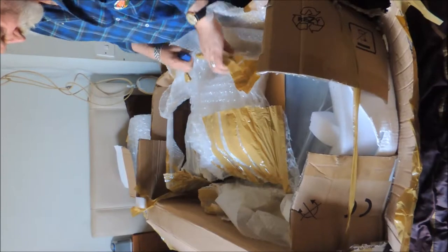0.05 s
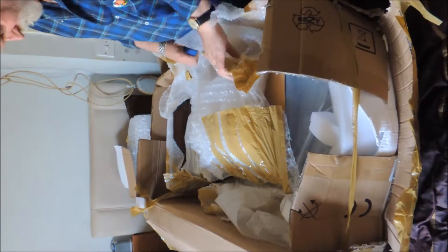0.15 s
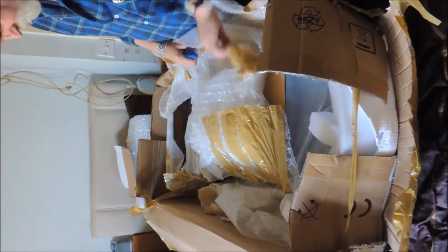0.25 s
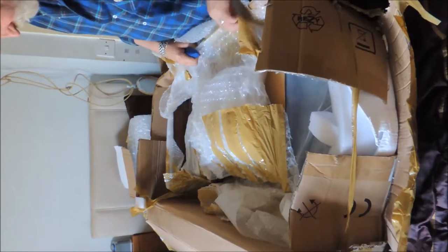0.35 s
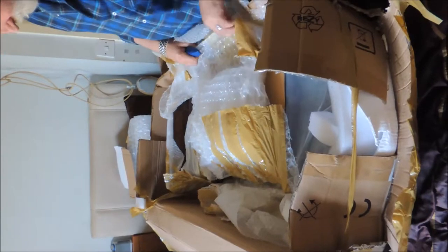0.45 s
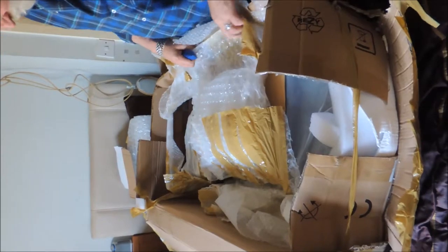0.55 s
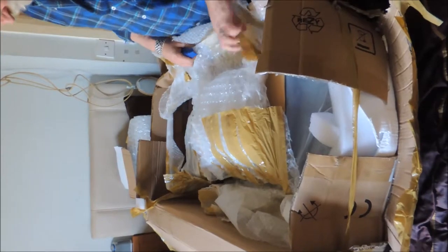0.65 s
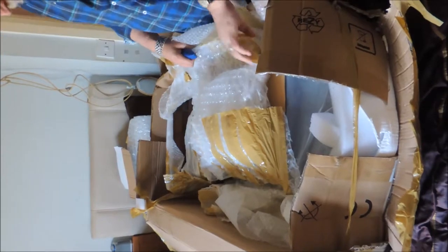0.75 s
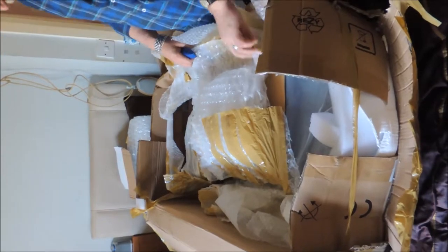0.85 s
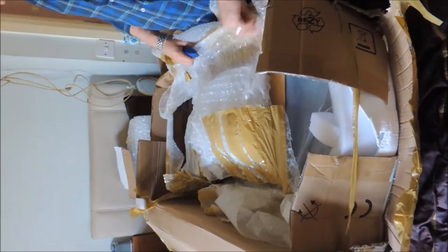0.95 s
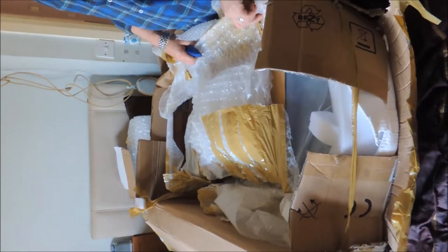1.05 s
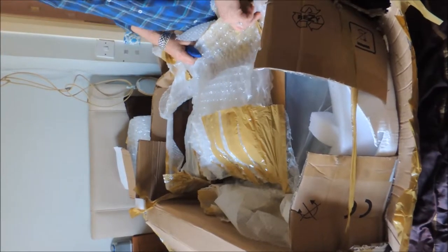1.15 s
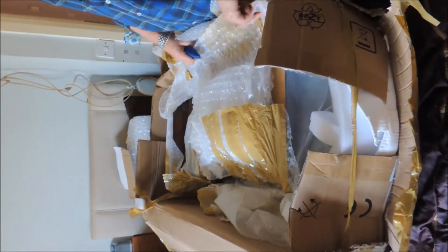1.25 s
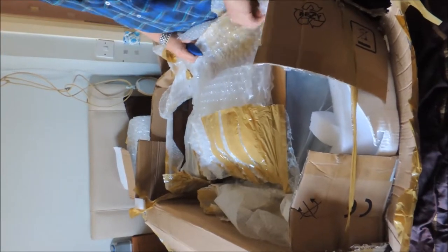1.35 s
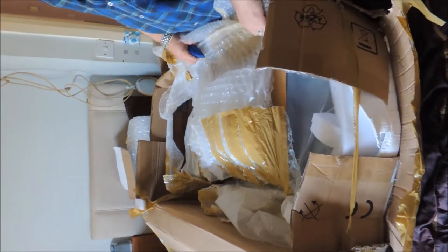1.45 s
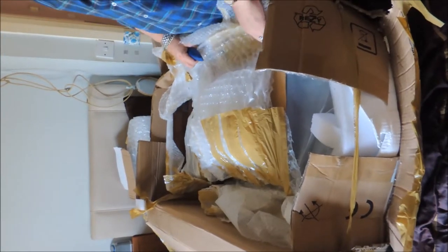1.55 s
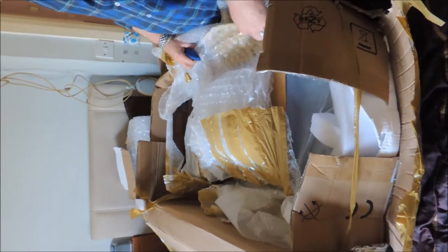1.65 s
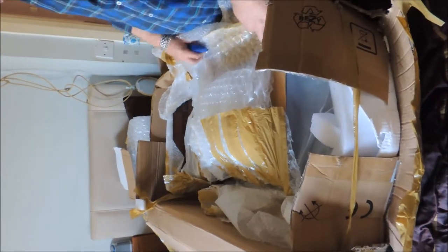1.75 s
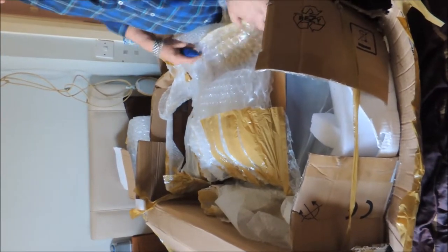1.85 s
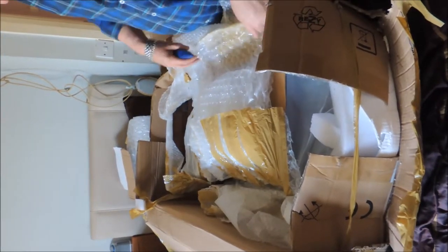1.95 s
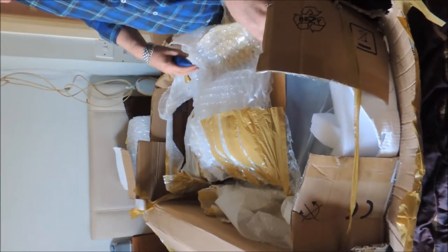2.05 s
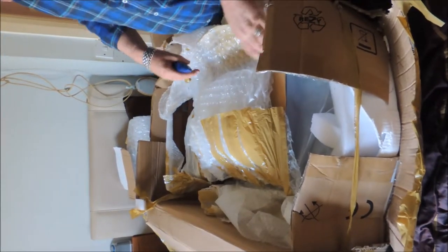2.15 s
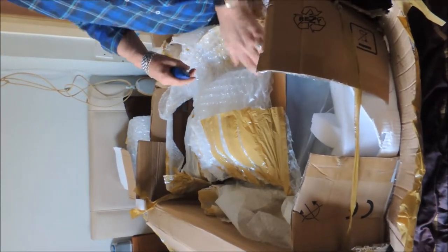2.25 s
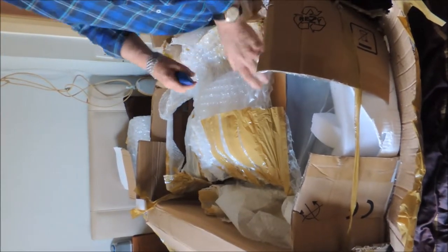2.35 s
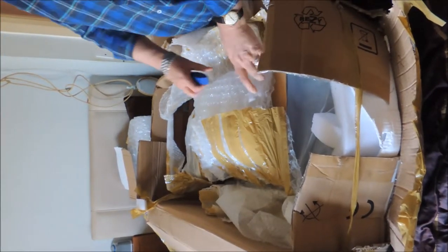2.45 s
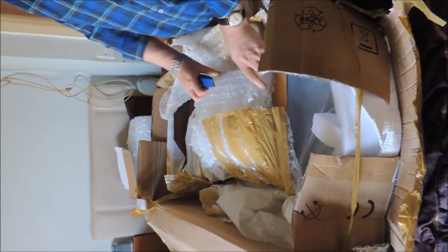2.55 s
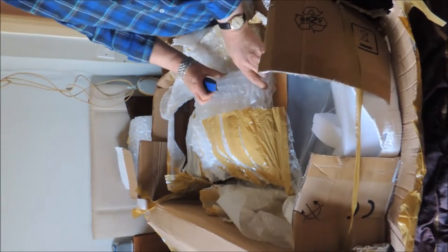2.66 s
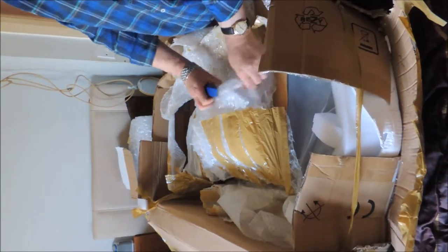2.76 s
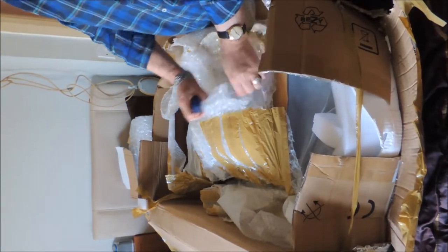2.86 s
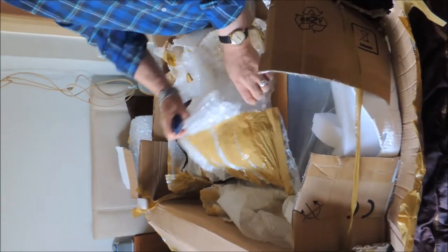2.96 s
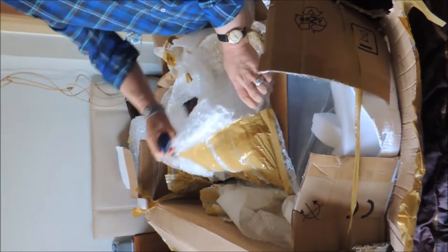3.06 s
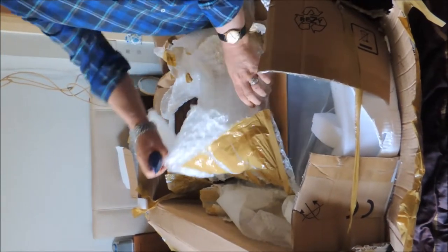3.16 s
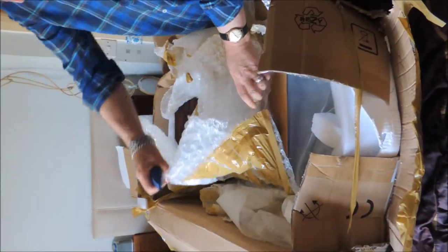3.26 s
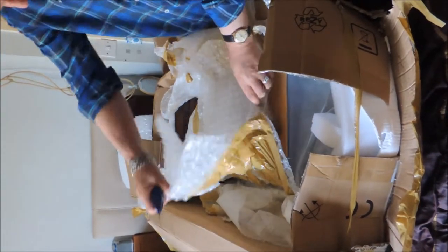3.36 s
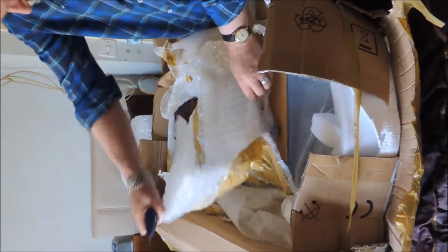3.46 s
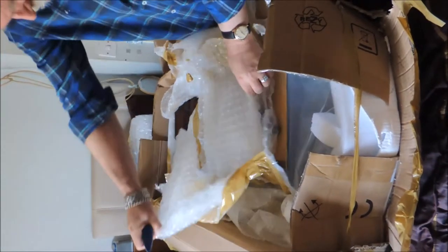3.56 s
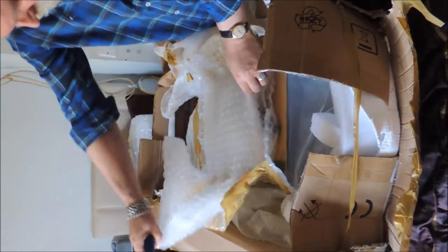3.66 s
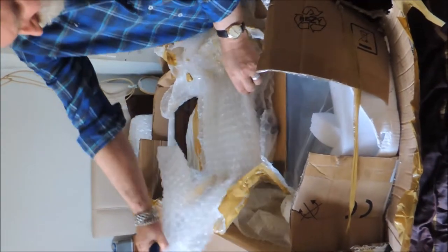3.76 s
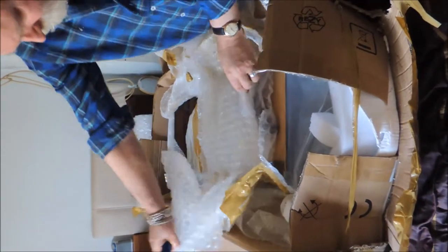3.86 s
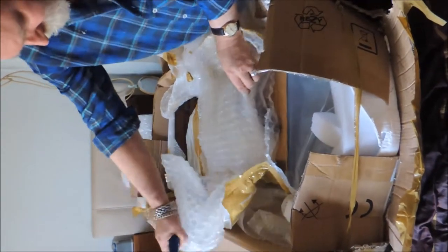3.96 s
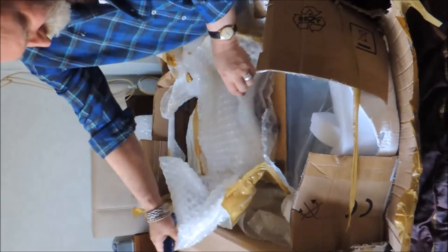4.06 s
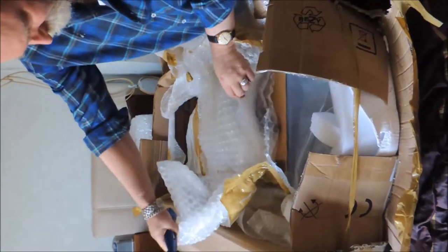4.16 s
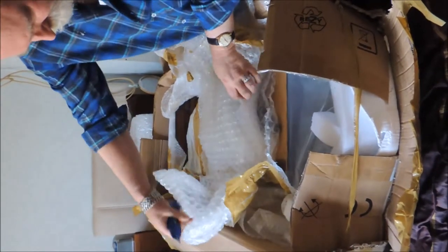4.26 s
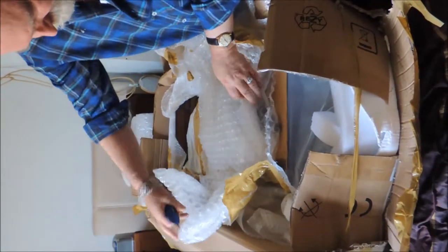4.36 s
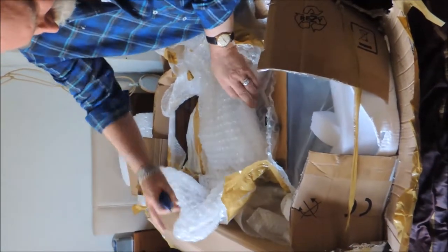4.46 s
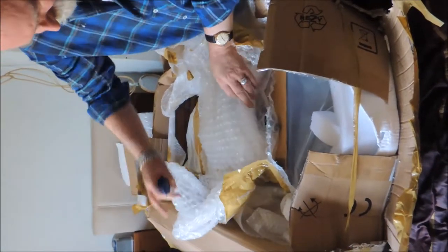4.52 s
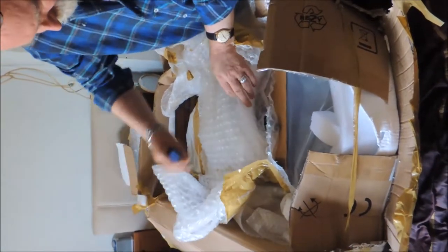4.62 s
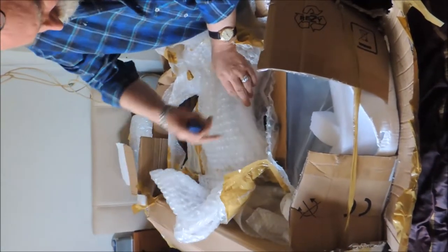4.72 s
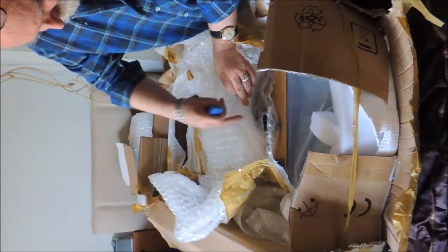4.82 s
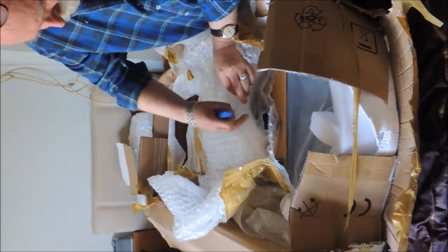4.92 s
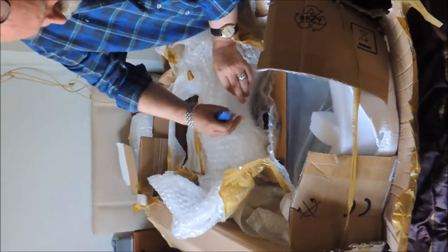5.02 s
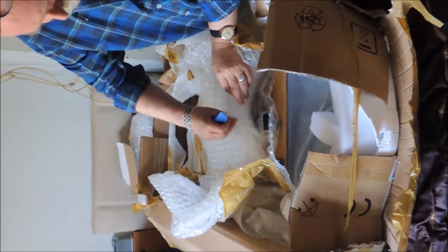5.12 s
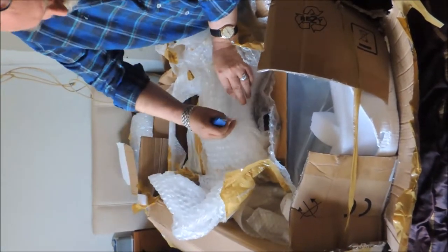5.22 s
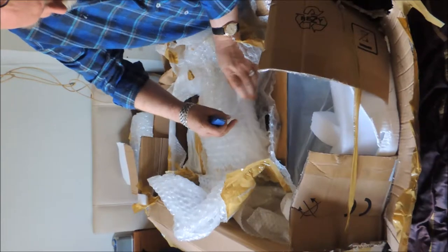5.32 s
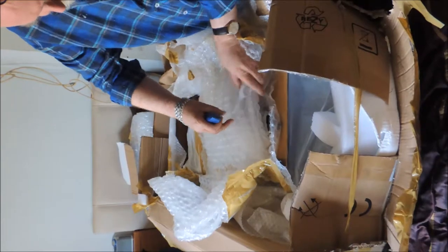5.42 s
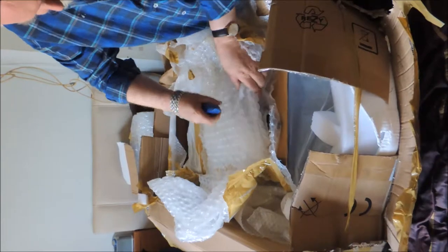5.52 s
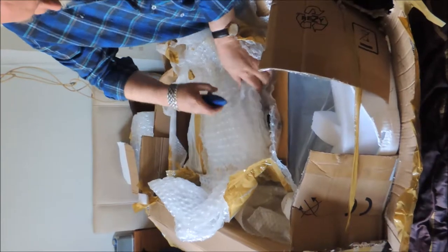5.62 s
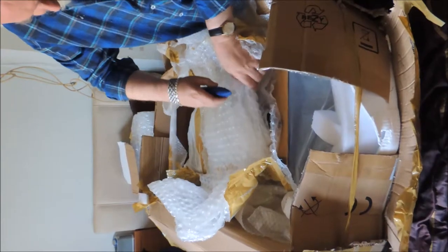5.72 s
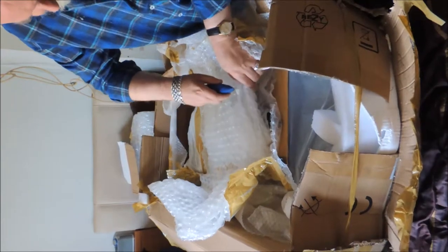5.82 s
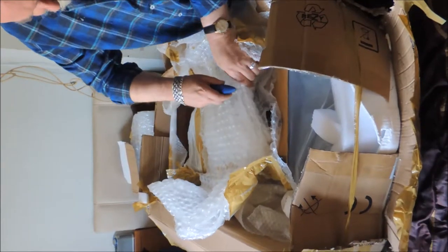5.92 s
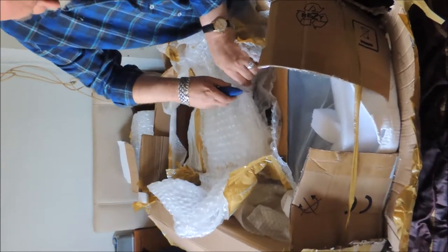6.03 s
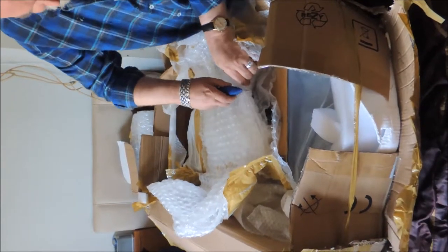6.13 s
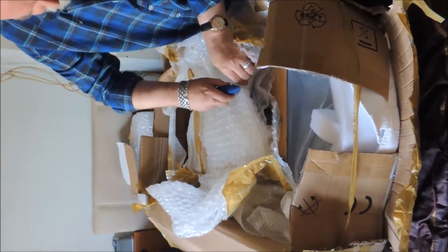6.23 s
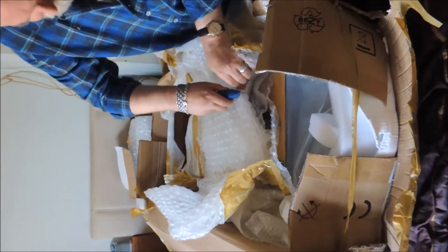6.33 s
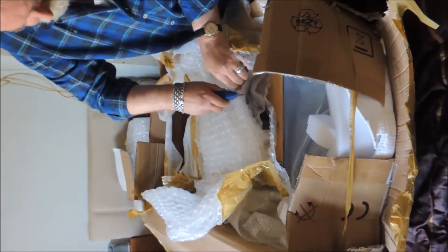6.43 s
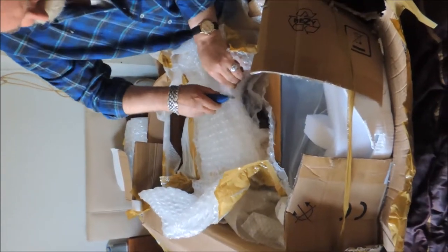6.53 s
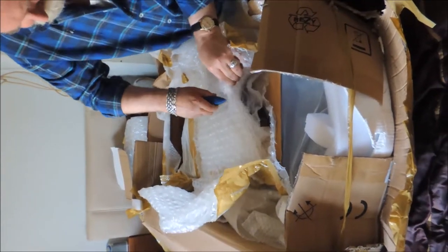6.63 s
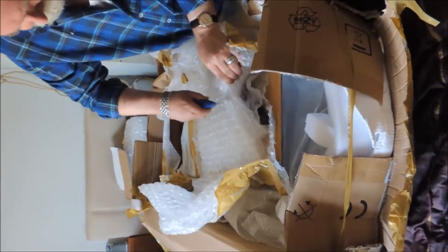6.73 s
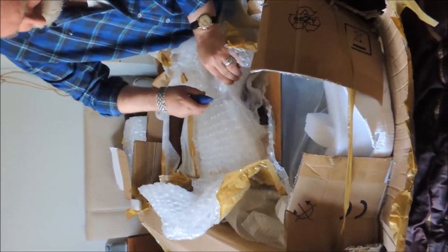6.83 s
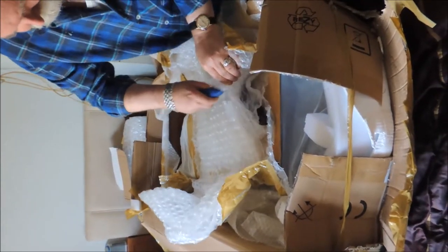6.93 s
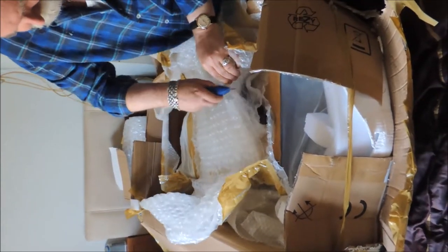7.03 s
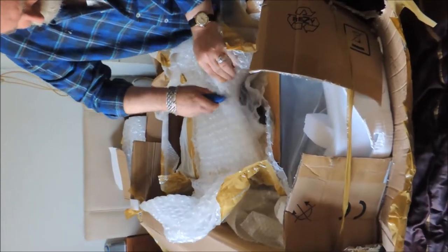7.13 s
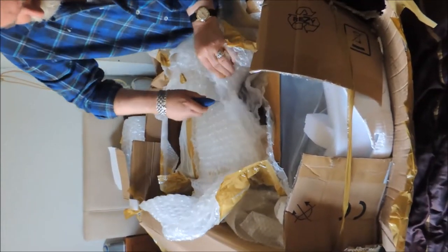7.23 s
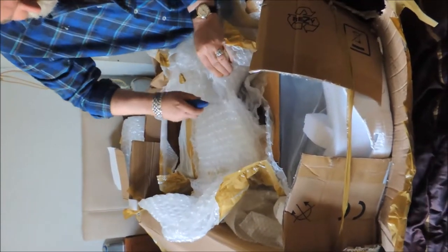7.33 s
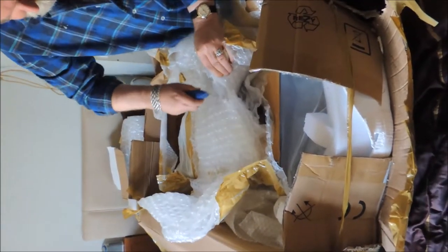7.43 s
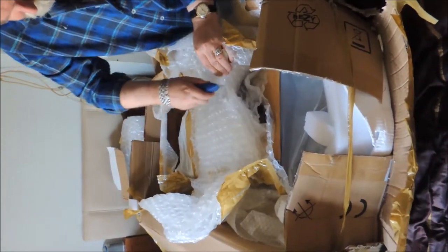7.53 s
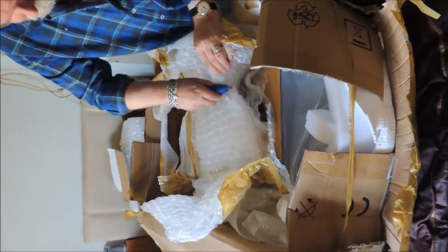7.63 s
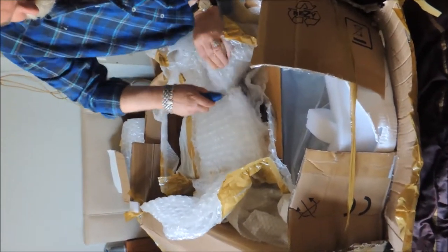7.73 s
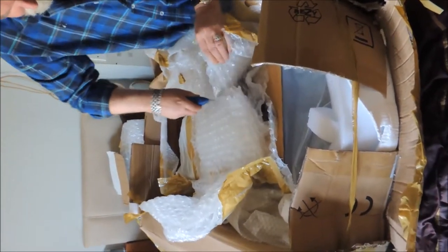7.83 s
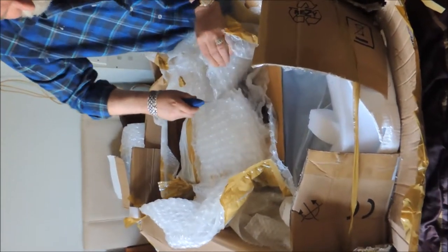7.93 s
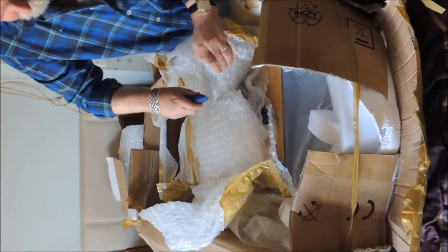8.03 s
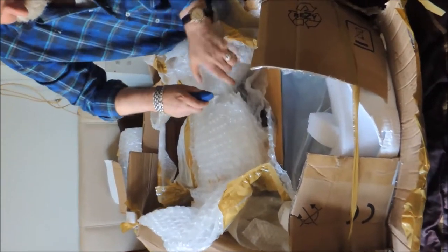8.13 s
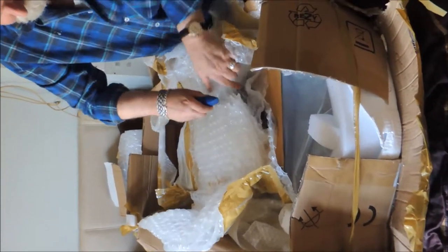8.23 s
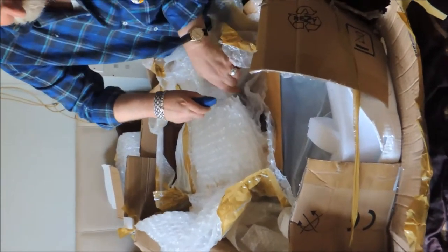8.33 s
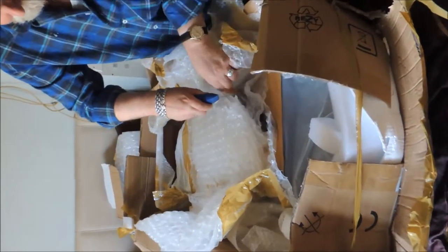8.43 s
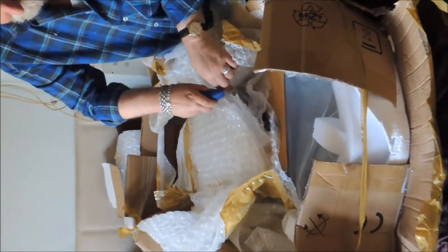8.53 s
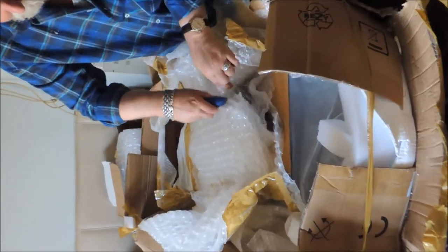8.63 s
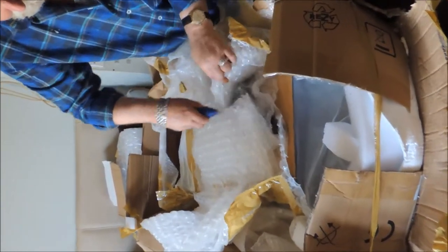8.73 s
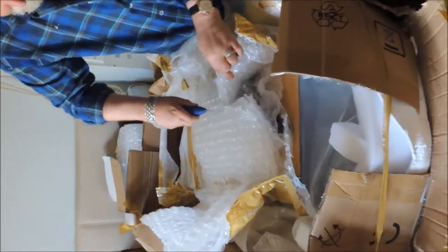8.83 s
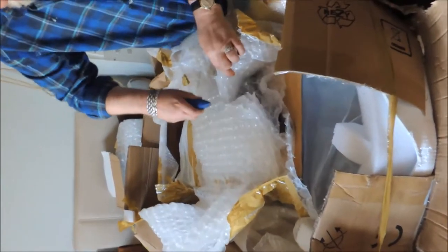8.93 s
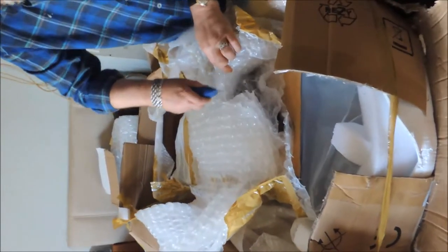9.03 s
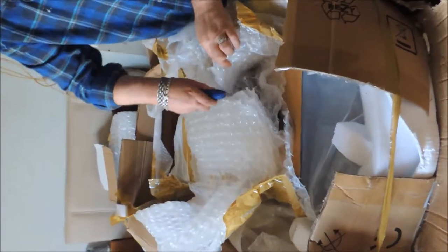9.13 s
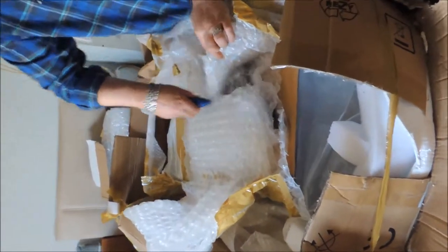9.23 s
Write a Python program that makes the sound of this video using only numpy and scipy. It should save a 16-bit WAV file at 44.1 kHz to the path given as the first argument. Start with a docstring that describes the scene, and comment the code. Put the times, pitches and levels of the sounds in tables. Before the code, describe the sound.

Close plastic packing film crinkles in uneven bursts, with sharp cracks, soft rustling and hollow cardboard bumps, indoors.

```python
"""In a small furnished room, hands pull taped bubble wrap out of a cardboard carton about a metre away.
Creases in the film buckle in sharp snaps and swarms of tiny crinkles: pulses with short damped rings.
Sheets rub and a sleeve slides as shaped noise; nudged cardboard scuffs in dull bands of noise.
Every click comes back from flaps and walls and rings the hollow carton, over room tone and a low air
rumble. The loudest cracks are limited and rounded off."""
import sys
import numpy as np
from scipy import signal
from scipy.fft import rfft, irfft, next_fast_len
from scipy.io import wavfile
from scipy.ndimage import uniform_filter1d, minimum_filter1d

SR = 44100
rng = np.random.default_rng(int(sys.argv[2]) if len(sys.argv) > 2 else 0)


def to_wav(sig):
    """Store sig (one row per channel, or 1-D mono) as 16-bit WAV at the path in sys.argv[1].

    Samples outside -1..1 are clipped; the rate is SR.
    """
    pcm = np.clip(np.atleast_2d(sig), -1, 1) * 32767
    pcm = np.round(pcm).astype(np.int16)
    wavfile.write(sys.argv[1], SR, pcm.T)  # frames by channels


N = 409248
TIME = np.arange(N) / SR
SIZE = next_fast_len(N + SR)  # transform length, with room for the tails
FREQ = np.maximum(np.arange(SIZE // 2 + 1) * SR / SIZE, 1)
TOP_HZ = 14300  # upper edge of the sound


def undb(db):
    """Decibels to gain."""
    return 10 ** (np.asarray(db) / 20)


def unit(x):
    """Scale to rms 1."""
    return x / np.sqrt(np.mean(x ** 2))


def unit_energy(x):
    """Scale a response to energy 1 per channel, averaged over the channels."""
    return unit(x) / np.sqrt(x.shape[-1])


def curves(table):
    """Each column of a curve table, interpolated at every sample."""
    s, *columns = np.transpose(table)
    return np.array([np.interp(TIME, s, column) for column in columns])


def colour(points):
    """Gain at every frequency from (f/Hz, level/dB) points, joined on a log frequency axis."""
    hz, db = np.transpose(points)
    return undb(np.interp(np.log(FREQ), np.log(hz), db))


def shaped(x, gain):
    """Filter by a gain at every frequency."""
    return irfft(rfft(x, SIZE) * gain, SIZE)[..., :x.shape[-1]]


# stereo width at the two microphone ports: f/Hz, side minus mid level/dB
SIDE_WIDTH = [(150, -19), (450, -17), (1000, -6), (2200, 0), (7000, 1), (12000, -1)]


def diffuse(size):
    """Noise from all around: alike at both ports in the bass, nearly unrelated in the treble."""
    mid, side = rng.standard_normal((2, size))
    width = colour(SIDE_WIDTH)
    norm = 1 / np.sqrt(1 + width ** 2)
    return shaped(mid, norm) + shaped(side, width * norm) * np.array([[1], [-1]])


def resonant_noise(hz, width_hz):
    """Noise in one resonance whose centre may move: slow noise carried up to that pitch."""
    slow = shaped(diffuse(N), 1 / (1 + (2 * FREQ / width_hz) ** 2))
    phase = 2 * np.pi * np.cumsum(hz * np.ones(N)) / SR
    return unit(slow * np.cos(phase))


# colour of the quiet room: f/Hz, relative spectrum level/dB
ROOM_TONE = [(18, -28), (30, -33), (144, -8.5), (241, -12.5), (1460, -44), (1700, -36), (2840, -41),
             (4400, -17), (14000, -57)]
ROOM_TONE_DB = -58.5


def air(level_db, draught_db=-48, draught_growth=0.19, corner_hz=45):
    """The quiet room, and the low rumble of stirred air at the ports, stronger when hands work harder."""
    room_tone = unit(shaped(diffuse(N), colour(ROOM_TONE)))
    rumble = unit(shaped(diffuse(N), FREQ / (FREQ + 10) / (1 + (FREQ / corner_hz) ** 2)))
    stir_db = draught_db + draught_growth * uniform_filter1d(level_db, size=SR // 8)
    return undb(ROOM_TONE_DB) * room_tone + undb(stir_db) * rumble


# a sleeve sliding over the film: t/s, resonance f/Hz, level/dB
SLEEVE_SLIDE = [(2.3, 4660, -66), (2.42, 4620, -58), (2.56, 4430, -47), (2.68, 4730, -52),
                (2.77, 5260, -39), (2.86, 5730, -42), (2.98, 6340, -65)]


def slide(width_hz=1500):
    """Cloth swishes over the film as a band of noise that swells and climbs in pitch."""
    hz, db = curves(SLEEVE_SLIDE)
    sliding = (TIME > SLEEVE_SLIDE[0][0]) * (TIME < SLEEVE_SLIDE[-1][0])
    return undb(db) * sliding * resonant_noise(hz, width_hz)


# a hand leaning on or bumping the cardboard: t/s, level/dB, f/Hz, spread (one sigma of the swell)/s
CARTON_NUDGES = [(0.658, -42.5, 250, 0.0099), (1.75, -37.5, 1000, 0.014), (2.04, -37, 347, 0.0068),
                 (2.163, -39.5, 260, 0.0092), (2.63, -42, 334, 0.026), (2.63, -44, 855, 0.033),
                 (2.753, -43.5, 190, .014), (2.938, -45, 230, 0.014), (3.79, -40, 189.6, 0.032),
                 (4.728, -47, 258, .01), (5.129, -35, 261, 0.0081), (5.5, -32.5, 400, .018),
                 (7.405, -41, 296.5, .025), (7.488, -44.5, 260, 0.01), (7.904, -13.5, 800, 0.0051),
                 (8.646, -48, 802, .015), (8.825, -24, 290, 0.0039)]


def nudges(width_share=0.99):
    """The cardboard gives a dull, hollow scuff where the hand presses it: a swell of resonant noise."""
    total = 0
    for s, db, hz, spread in CARTON_NUDGES:
        swell = np.exp(-.5 * ((TIME - s) / spread) ** 2)
        total = total + undb(db) * swell * resonant_noise(hz, width_share * hz)
    return total


# ring of the carton, slightly detuned from spot to spot: f/Hz, relative level/dB, t60/s
CARTON_MODES = [(195.3, -4, 0.11), (251, -4.5, 0.12), (347, 7, 0.082), (399.3, -1, 0.13),
                (703.5, -5.5, 0.26), (789.6, -4.5, 0.23), (853, 3, 0.11), (955, 3.5, 0.074)]
# first echoes from flaps, floor and wall: nominal delay t/s, level/dB
FIRST_ECHOES = [(.0055, -8), (.0122, -12), (.0165, -12)]
ROOM_T60_S, ROOM_DB = .27, -3.5


def click_response(flutter_s=.0007, flutter_db=1.5, flutter_hz=900, build_s=.004,
                   carton_db=-16.5, late_db=-26, late_t60_s=.6):
    """One buckle at one spot: a pulse, a brief flutter of film, first echoes, the carton's ring, the room."""
    t = np.arange(SR // 2) / SR
    high_pass = signal.butter(1, flutter_hz, "high", fs=SR)
    flutter = signal.lfilter(*high_pass, diffuse(len(t)) * np.exp(-t / flutter_s))
    direct = undb(flutter_db) * unit_energy(flutter)
    # left pulse at sample 1, right pulse at sample 0, 1 or 2, depending on the spot
    direct[0, 1] += 1
    direct[1, rng.integers(3)] += 1
    direct = unit_energy(direct)
    echoes = 0
    for delay, db in FIRST_ECHOES:
        # crumpled surfaces smear each echo, and its path differs from spot to spot
        age = t - delay * (1 + .1 * rng.uniform(-1, 1))
        smear = diffuse(len(t)) * (age > 0) * np.exp(-np.abs(age) / flutter_s)
        echoes = echoes + undb(db) * unit_energy(smear)
    ring = 0
    for hz, db, t60 in CARTON_MODES:
        spot_hz = hz * (1 + 0.0047 * rng.standard_normal())
        mode = np.sin(2 * np.pi * (spot_hz * t + rng.random()))
        ring = ring + undb(db) * mode * undb(-60 * t / t60)
    decay = undb(-60 * t / ROOM_T60_S) + undb(late_db) * undb(-60 * t / late_t60_s)
    room = unit_energy(diffuse(len(t)) * (1 - np.exp(-t / build_s)) * decay)
    return direct + echoes + undb(carton_db) * unit_energy(ring) + undb(ROOM_DB) * room


# thud and box registers against the third, and how much faster the thud grows with contact
THUD_DB, BOX_DB, THUD_GROWTH = 1.5, 0.07, 1.3


def register_gains(level_db, contact_db, crisp_db):
    """Gains of the four registers: a buckle on the carton thuds, one in free film is only crisp."""
    thud_db = THUD_DB + THUD_GROWTH * contact_db
    return undb(level_db + np.array([thud_db, BOX_DB + contact_db, 0, crisp_db]))


# light rustle of the sheets while hands rest on them or move along: t/s, level/dB
SHEET_RUSTLE = [(0, -37), (.25, -34.5), (.52, -52), (.85, -46), (1.0, -43), (1.48, -53), (1.56, -44),
                (1.85, -41), (2.15, -42.5), (2.25, -52.5), (2.48, -53), (2.57, -41), (2.68, -43.5),
                (2.92, -35), (3.0, -37.5), (3.9, -39.5), (4.0, -45.5), (4.13, -49.5), (4.5, -46.5),
                (4.68, -41.5), (4.84, -46.5), (5.0, -39.5), (5.09, -31), (5.33, -42), (5.66, -48.5),
                (6.05, -44), (6.45, -49.5), (6.62, -35), (6.93, -59), (7.35, -41.5), (7.56, -63.5),
                (7.68, -55.5), (8.05, -61), (8.35, -59), (8.46, -47.5), (8.72, -41.5), (9.06, -54),
                (9.28, -48.5)]
# grabs and pulls that crumple the wrap: start t/s, rise/s, hold/s, level/dB, contact with the carton/dB
GRABS = [(0.107, 0.035, 0.068, -30.5, 5.5), (0.3, 0.021, 0.092, -17, 3.5), (0.549, 0.051, 0.048, -40, -6),
         (1.002, 0.029, 0.046, -32.5, -4), (1.056, 0.015, 0.078, -20.5, -1),
         (1.26, 0.0065, 0.013, -30.5, -2), (1.855, .01, .025, -38.5, 0), (1.94, 0.0089, 0.14, -44, 11),
         (2.136, 0.019, 0.013, -36.5, 1.5), (3.426, 0.011, 0.067, -27.5, 3),
         (3.515, 0.04, 0.059, -22.5, -1), (3.631, 0.011, 0.045, -20.5, 0), (3.748, 0.011, 0.069, -26, 4),
         (3.85, 0.028, 0.042, -32, 3.5), (4.173, 0.011, 0.043, -39.5, -1.5),
         (4.268, 0.0091, 0.12, -39, 1.5), (5.152, 0.0086, 0.1, -30.5, -2.5), (5.439, 0.014, 0.12, -32, 4),
         (5.702, 0.012, 0.064, -44.5, 11), (5.93, .008, 0.022, -34.5, -7),
         (6.268, 0.038, 0.048, -38.5, -0.5), (6.635, 0.0041, 0.014, -15, -5.5),
         (6.695, .005, 0.048, -27.5, 9.5), (6.792, 0.011, 0.054, -38, 2.5), (7.07, 0.017, 0.014, -44, 0),
         (7.21, .005, .012, -37, -5), (7.268, 0.029, 0.018, -32, 8), (7.376, 0.032, 0.097, -42.5, 2.5),
         (7.704, 0.041, 0.054, -39.5, -2), (7.847, .015, .035, -28.5, 10), (7.88, .003, 0.0079, -30, 12),
         (8.379, .015, 0.021, -45.5, 3.5), (8.739, 0.036, .03, -28.5, 9), (8.808, 0.003, 0.011, -12.5, -1),
         (8.858, .01, 0.016, -43, 10), (9.108, 0.0099, 0.024, -49, 6)]
GRAB_CRISP_DB = 2.5
# a crumple eases off while it is held and dies when the hand lets go
SAG_DB_PER_S, RELEASE_DB_PER_S = 37.5, 455
# a snap sets off a swarm of crinkles after it, larger for a stronger snap
SWARM_DB, SWARM_GROWTH, SWARM_FALL_DB_PER_S = -20, 0.84, 302.5


def handling(rustle_contact_db=-1, rustle_crisp_db=2, swarm_crisp_db=0.0):
    """Crinkling strength: rustle, crumples and swarms after snaps add in power; registers x time."""
    rustle_gains = register_gains(0, rustle_contact_db, rustle_crisp_db)
    power = np.outer(rustle_gains, undb(curves(SHEET_RUSTLE)[0])) ** 2
    age = np.arange(SR // 2) / SR
    bursts = []
    for s, rise, hold, db, contact_db in GRABS:
        sag_db = SAG_DB_PER_S * np.maximum(age - rise, 0)
        release_db = RELEASE_DB_PER_S * np.maximum(age - rise - hold, 0)
        envelope = np.minimum(age / rise, 1) * undb(-sag_db - release_db)
        bursts.append((s, register_gains(db, contact_db, GRAB_CRISP_DB), envelope))
    for s, db, contact_db, _, _ in FILM_SNAPS:
        gains = register_gains(SWARM_DB + SWARM_GROWTH * db, contact_db / 2, swarm_crisp_db)
        bursts.append((s, gains, undb(-SWARM_FALL_DB_PER_S * age)))
    for s, gains, envelope in bursts:
        start = int(s * SR)
        power[:, start:start + len(age)] += np.outer(gains, envelope[:N - start]) ** 2
    return np.sqrt(power)


def buckles(hz, ring_db, q):
    """One row of force per buckle: a pulse, then the pocket of film around it rings for a few cycles."""
    t = np.arange(SR // 150) / SR
    hz = np.reshape(hz, (-1, 1))
    damping = np.pi * hz / q
    ring = 2 * damping / SR * np.exp(-damping * t) * np.cos(2 * np.pi * hz * t)
    force = undb(ring_db) * ring
    force[:, 0] += 1
    return force


def crinkle(level_db, count, rate=600, rate_growth=.08, scatter_db=2.5, ring_db=7, q=7, rub_db=-6, rub_fall=0.3):
    """Tiny buckles of pockets of all sizes; under a light hand the hiss of film on film takes over: spots x time."""
    effort_db = level_db + 40
    # rate is in buckles per second at effort 0 dB
    chance = np.clip(rate * undb(rate_growth * effort_db) / SR, 1e-4, 1)
    scatter = unit(undb(scatter_db * np.clip(rng.standard_normal(N), -2, 2)))
    sizes = scatter * rng.choice([-1, 1], N) / np.sqrt(chance)  # sparser buckles are bigger
    pocket_hz = 900 * 10 ** rng.random(N)
    spot = rng.integers(count, size=N)
    starts = np.flatnonzero(rng.random(N) < chance)
    force = unit_energy(buckles(pocket_hz[starts], ring_db, q)) * sizes[starts, None]
    rub_gain = undb(rub_db - rub_fall * np.maximum(effort_db, -10))
    out = rub_gain * rng.standard_normal((count, N)) / np.sqrt(count)
    places = np.minimum(starts[:, None] + np.arange(force.shape[1]), N - 1)
    np.add.at(out, (spot[starts, None], places), force)
    return out


# single creases and tape giving way; handling() also starts a swarm at each:
# t/s, level over 1 ms/dB, contact with the carton/dB, crispness/dB, ring of the film f/Hz
FILM_SNAPS = [(0.0792, -13.5, -4.5, -3, 775), (.1407, -12, -4, -5, 7300), (0.2272, -6.5, 1.5, -2, 1690),
              (.322, -18, 8.5, 12, 850), (0.3275, -14.5, 12.5, -5, 930), (0.7318, -26, 0.5, -4, 2250),
              (0.879, -16.5, -9, -9, 6000), (1.086, -4.5, -5, 2, 8000), (1.1412, -10.5, 3, 4, 6370),
              (1.2641, -28, 0, 5.5, 8200), (1.3766, -19.5, 1.5, 4, 3860), (1.6304, -24.5, 0.5, -1, 7540),
              (1.7361, -17, -11, -0.5, 1930), (1.855, -23, 1, -5, 1700), (1.9666, -12.5, -1, -23, 3540),
              (3.105, -4.5, -2.5, -13, 3100), (3.1097, -12.5, 3, 7, 7040), (3.1189, -10.5, 3, -7, 1150),
              (3.19, -21.5, -9, -13, 8740), (3.2513, -19, -2, 3, 2300), (3.265, -5.5, -4.5, -1.5, 4250),
              (3.4015, -17.5, 0, -5, 3200), (3.416, -7, 2, 3.5, 1080), (3.4514, -9, 3.5, 3.5, 2180),
              (3.5208, -4.5, 0, 2.5, 2060), (3.557, -5, 0, 4, 4250), (3.6518, -8, -2.5, -11, 5860),
              (3.6838, -15.5, 0.5, -2, 2850), (3.7625, -10.5, -3, -6, 1140), (3.8806, -15.5, -8, -12, 2500),
              (4.1764, -29.5, -6, -1, 6760), (4.5931, -32.5, -12, 7, 8100), (4.6992, -24.5, -12, -3, 9200),
              (4.88, -30.5, -19, -3, 5700), (5.1217, -21.5, 11, 11, 815), (5.165, -23.5, 10.5, 16, 7400),
              (5.2501, -16.5, 4.5, 6.5, 6900), (5.365, -21.5, 4.5, 1, 2230), (5.454, -21.5, -7, 1.5, 8240),
              (5.4871, -14, 2, -9, 725), (5.6959, -21.5, 2, -3, 2450), (5.731, -15.5, 1, -5.5, 3100),
              (5.7949, -14.5, 3, -4, 930), (5.9391, -31, 1, 13.5, 4240), (5.9965, -21, -5, -4, 1240),
              (6.112, -25, -3, -5, 2010), (6.145, -22, 0, 0, 7320), (6.1959, -25, 0.5, -4, 5950),
              (6.6446, 8.5, -8, -20, 3260), (6.6523, 7, -7.5, -14, 5300), (6.6571, 4, -20, -16, 4670),
              (6.7297, -12.5, 3, -2, 895), (6.748, -16, 7, -10, 870), (7.0137, -32.5, 4, -1, 2120),
              (7.1658, -31.5, -3, -4, 4560), (7.22, -4.5, 4.5, -1.5, 3070), (7.2329, -19, -5, 10, 820),
              (7.274, -15, 0.5, 3.5, 8700), (7.3028, -16, 9, -6, 676), (7.4154, -23.5, -4, -1, 3300),
              (7.805, -21, -6, 8.5, 8950), (7.809, -9.5, -1.5, -9, 8000), (7.819, -6.5, 4.5, -12, 750),
              (7.839, -19, 3, 9.5, 725), (7.8868, -6.5, 7, -10, 750), (7.9027, -27, 17, 14, 780),
              (8.152, -35.5, 1, 5.5, 856), (8.2536, -21.5, 7, -0.5, 2800), (8.631, -27.5, 7, -13, 835),
              (8.7673, -8.5, 1.5, -15, 1810), (8.8165, -4, 5.5, -15, 720), (8.8202, 3, -1, -4.5, 6700),
              (9.1971, -38, 5, 3, 9100)]


def snaps(count, ring_db=3, q=5):
    """The big buckles, each a pulse and ring at one of the spots: spots x registers x time."""
    out = np.zeros((count, len(REGISTER_CENTRES), N), np.float32)
    for (s, *levels, hz), spot in zip(FILM_SNAPS, rng.integers(count, size=len(FILM_SNAPS))):
        force = np.sqrt(SR / 1000) * buckles(hz, ring_db, q)  # levels refer to 1 ms
        start = int(s * SR)
        out[spot, :, start:start + force.size] += np.outer(register_gains(*levels), force)
    return out


# centres of the thud, box, third and crisp registers: f/Hz
REGISTER_CENTRES = [260, 820, 2700, 8000]
# colour of the wrap: f/Hz, relative spectrum level/dB
WRAP_COLOUR = [(40, -45), (70, -18), (120, -15.5), (180, -5.5), (280, -8), (400, -7), (700, -4.5),
               (1400, -4.5), (3000, -3), (4200, -4), (7400, -3), (9700, -6.5), (14000, -8)]


def wrap(gains, level_db, count=7, sparkle_db=3, sparkle_hz=9500):
    """Snaps and crinkles from a few spots on the sheet, each with its own path to the microphone."""
    rows = np.eye(len(REGISTER_CENTRES))
    registers = np.array([np.interp(np.log(FREQ), np.log(REGISTER_CENTRES), row) for row in rows])
    registers = registers ** 2 / np.sum(registers ** 2, axis=0)  # each fades into its neighbours
    film = colour(WRAP_COLOUR) * (FREQ < TOP_HZ + 1000)
    # snaps are more abrupt than crinkles, so they reach higher
    sparkle = undb(sparkle_db / (1 + (sparkle_hz / FREQ) ** 6))
    total = 0
    for big, small in zip(snaps(count), crinkle(level_db, count)):
        spectra = rfft(big, SIZE) * sparkle + rfft(small * gains, SIZE)
        force = np.sum(spectra * registers, axis=0)
        total = total + force * rfft(click_response(), SIZE)
    return irfft(total * unit(film), SIZE)[:, :N]


# balance of the two microphone ports: f/Hz, left minus right level/dB
LEFT_LEAN = [(60, 3.2), (125, 7.5), (250, 3.3), (500, 5.3), (1000, 4), (3000, 3.7), (9000, 1.2)]


def scene():
    """Everything together, leaning to the left port."""
    gains = handling()
    level_db = 20 * np.log10(gains[2])  # the third register tells how hard the wrap is worked
    lean = colour(LEFT_LEAN)
    ports = np.array([lean, np.ones_like(lean)]) * np.sqrt(2 / (1 + lean ** 2))
    return shaped(air(level_db) + slide() + nudges() + wrap(gains, level_db), ports)


def record(dry):
    """A fast limiter ducks around the biggest cracks, peaks are rounded off, and the top is cut."""
    ceiling = 2.2
    allowed = np.minimum(1, ceiling / (np.abs(dry).max(axis=0) + 1e-9))
    ducked = dry * uniform_filter1d(minimum_filter1d(allowed, size=41), size=41)
    rounded = ducked / (1 + (ducked / .9) ** 4) ** (1 / 4)
    top_cut = signal.ellip(10, .2, 60, TOP_HZ, fs=SR, output="sos")
    return signal.sosfilt(top_cut, rounded)


dry = scene()
out = record(dry)
to_wav(out)
```